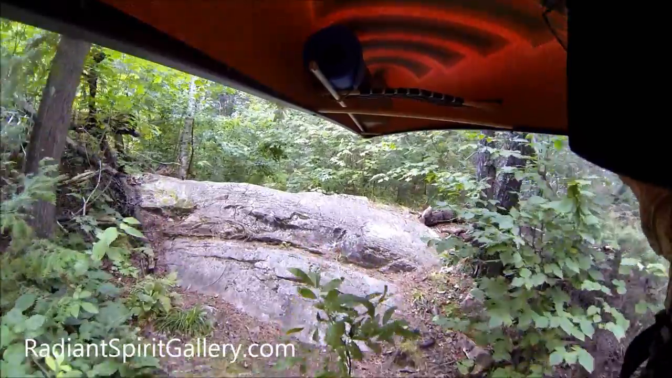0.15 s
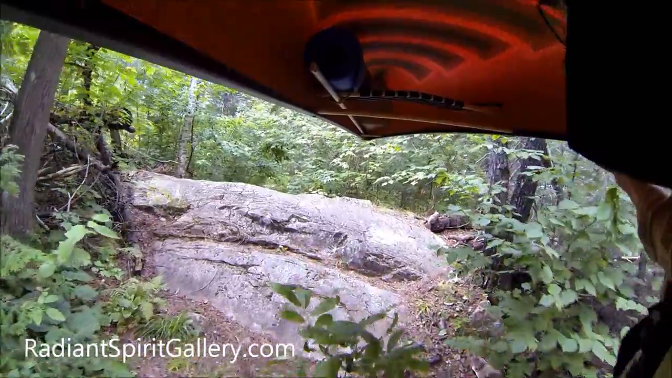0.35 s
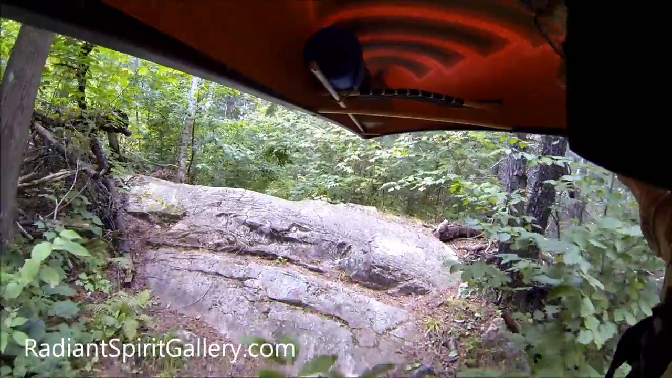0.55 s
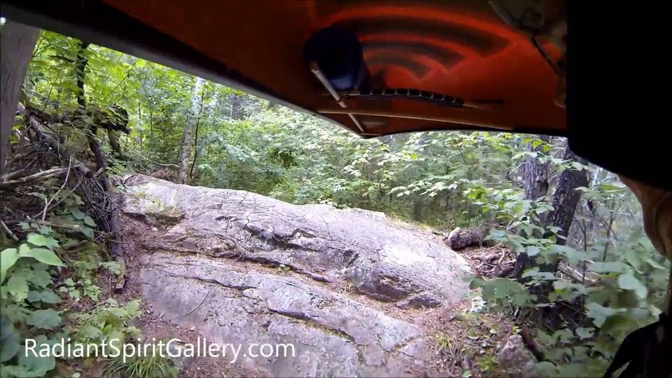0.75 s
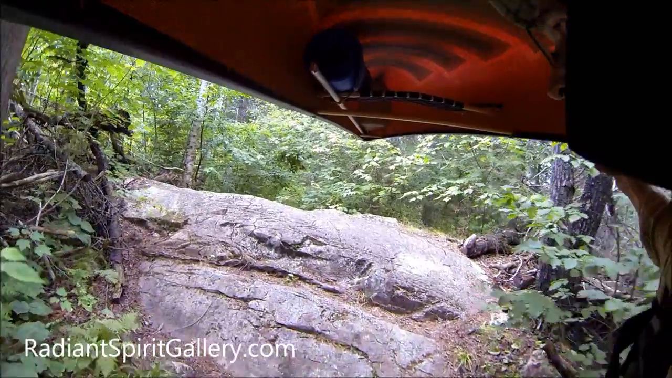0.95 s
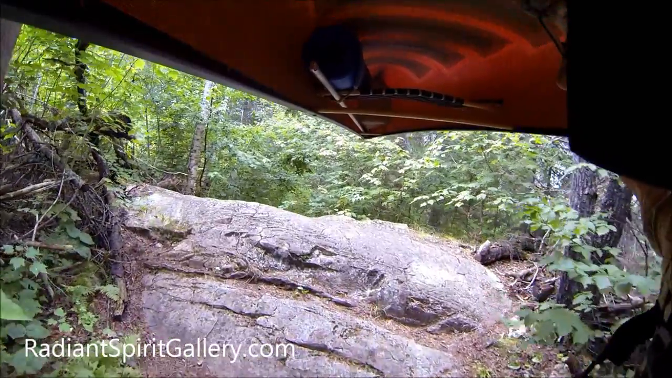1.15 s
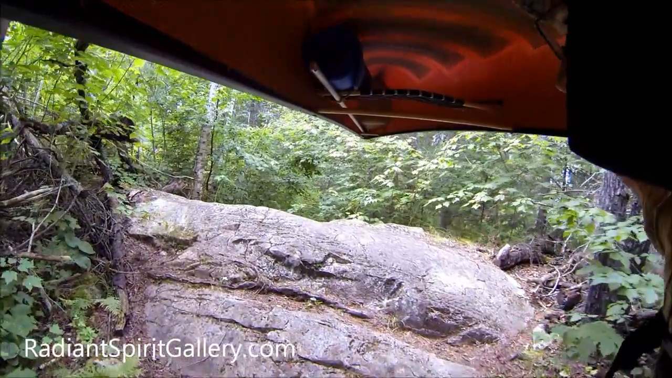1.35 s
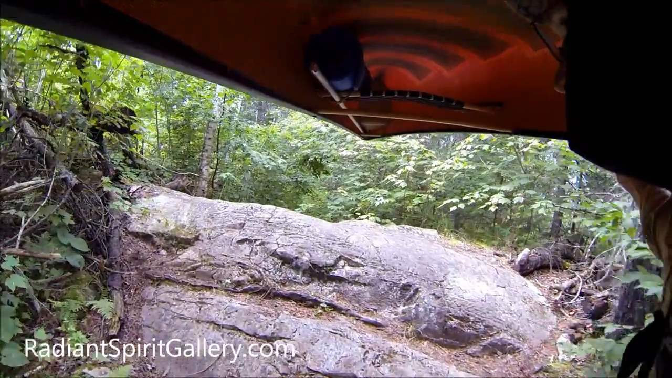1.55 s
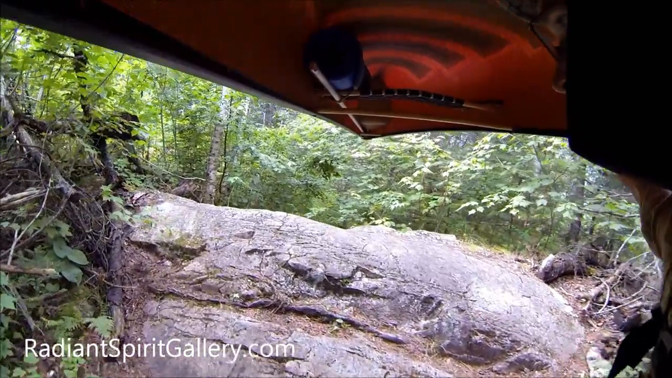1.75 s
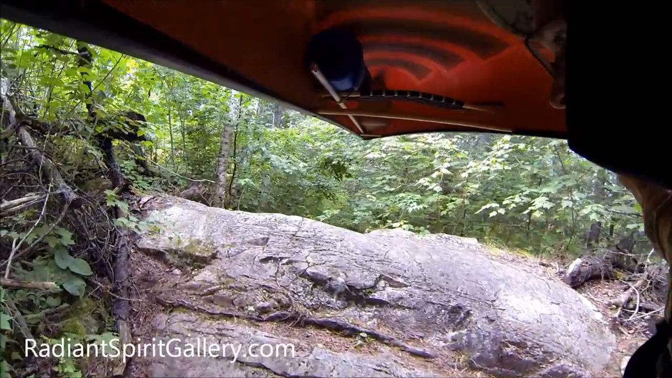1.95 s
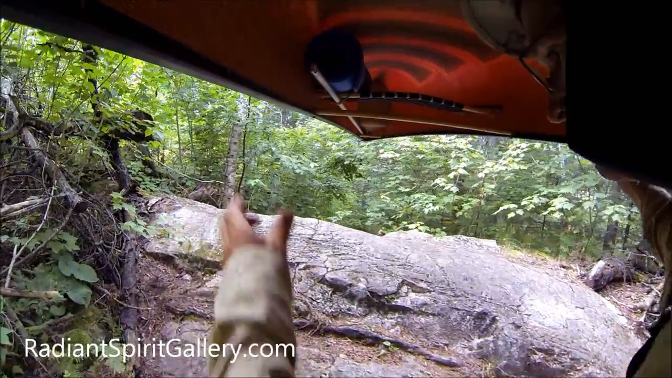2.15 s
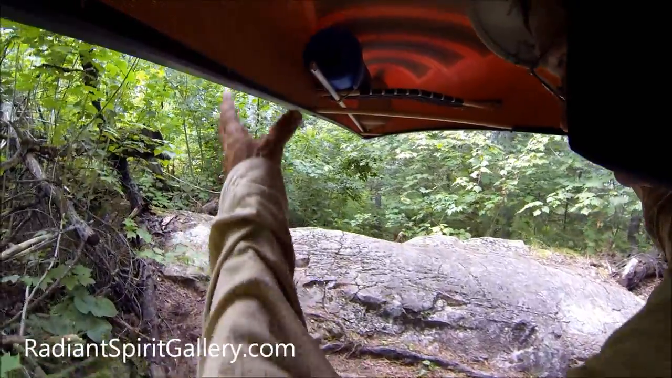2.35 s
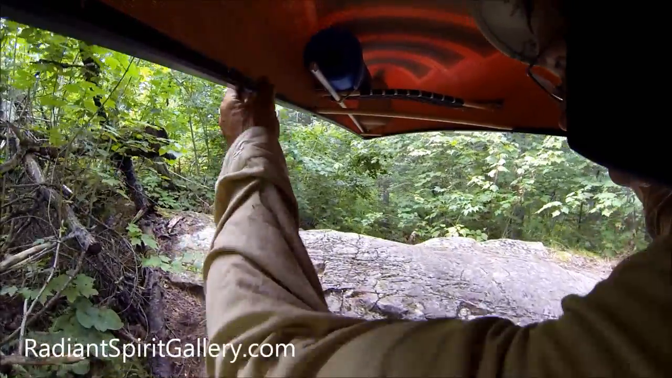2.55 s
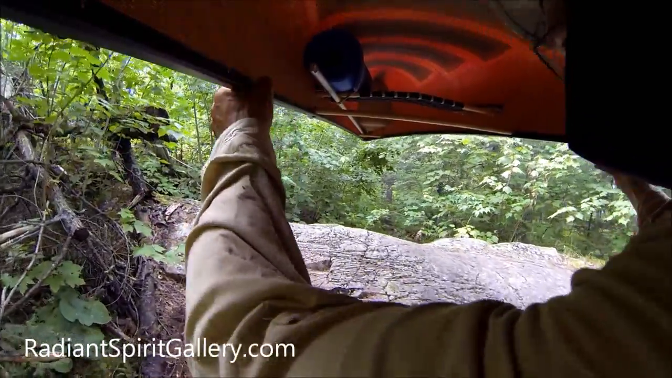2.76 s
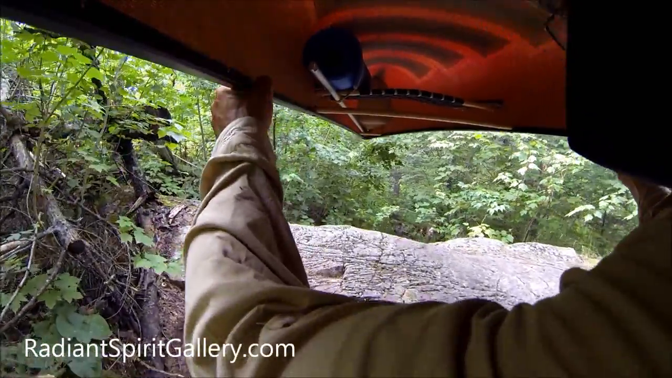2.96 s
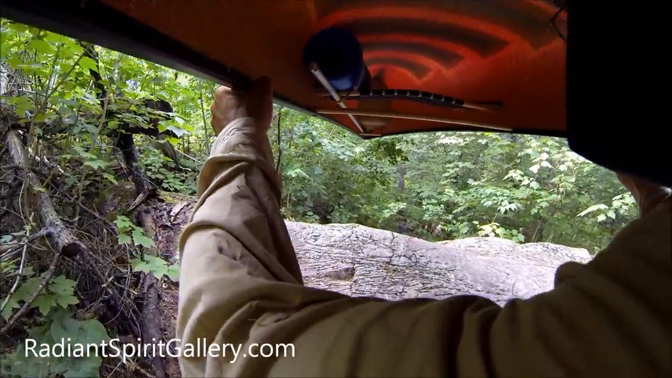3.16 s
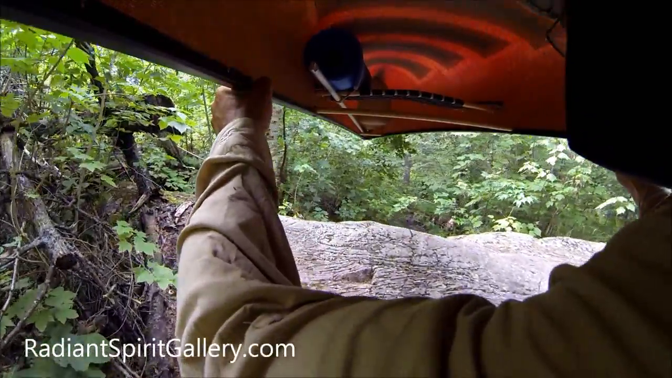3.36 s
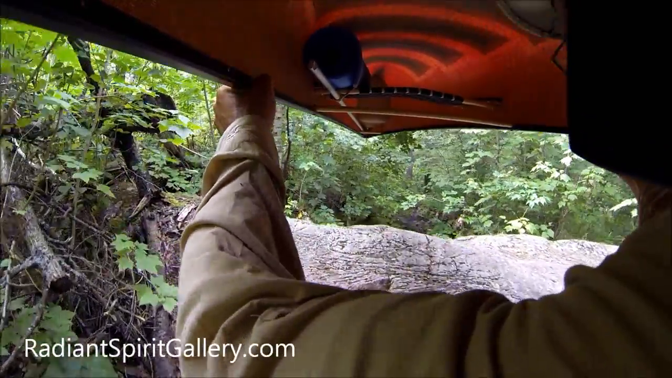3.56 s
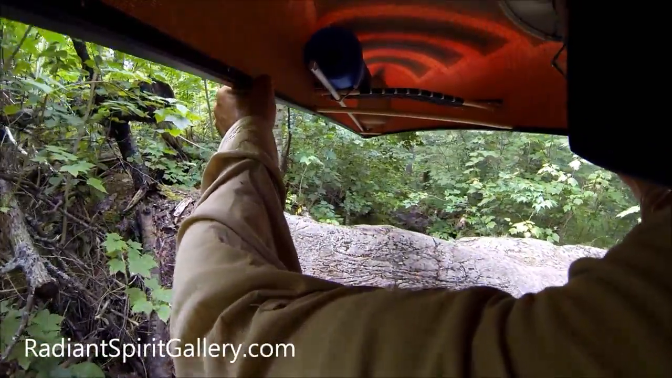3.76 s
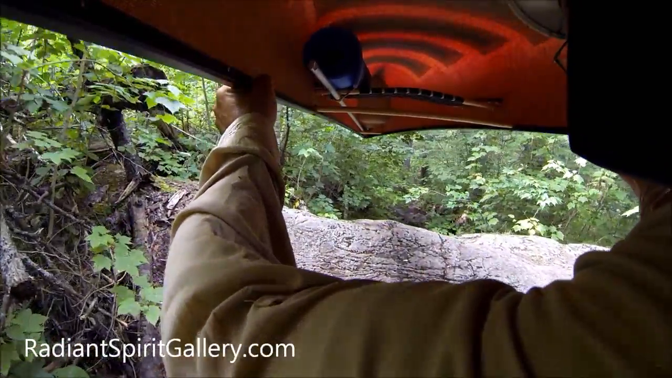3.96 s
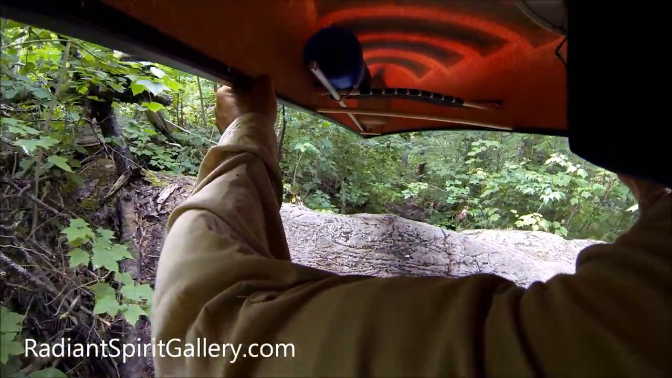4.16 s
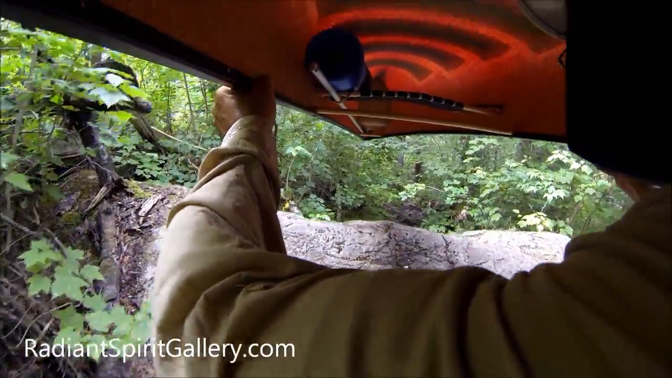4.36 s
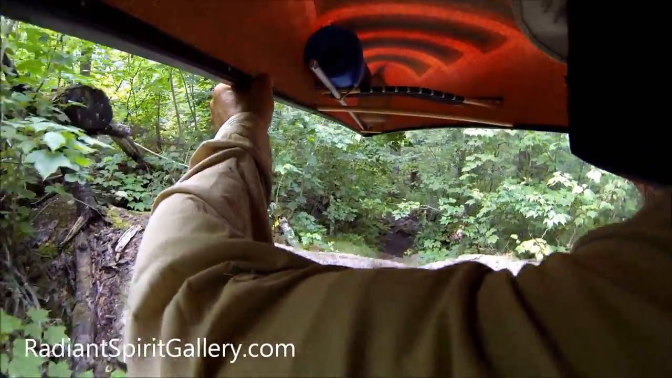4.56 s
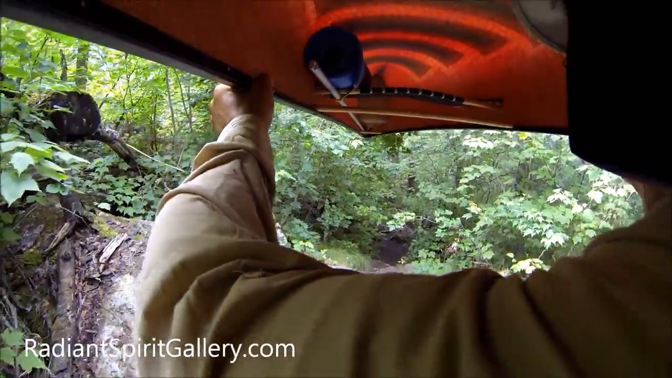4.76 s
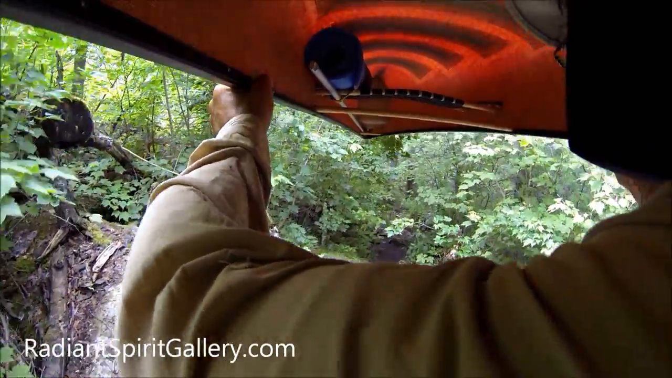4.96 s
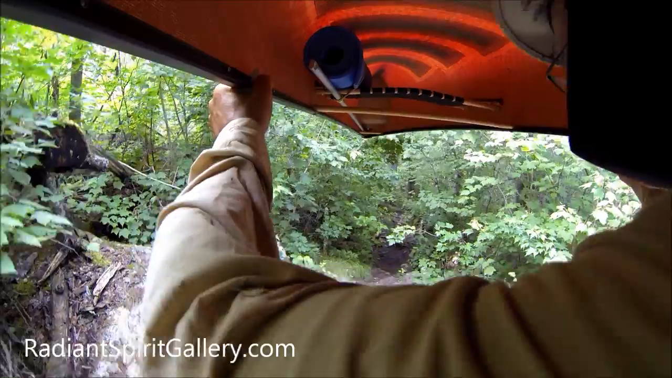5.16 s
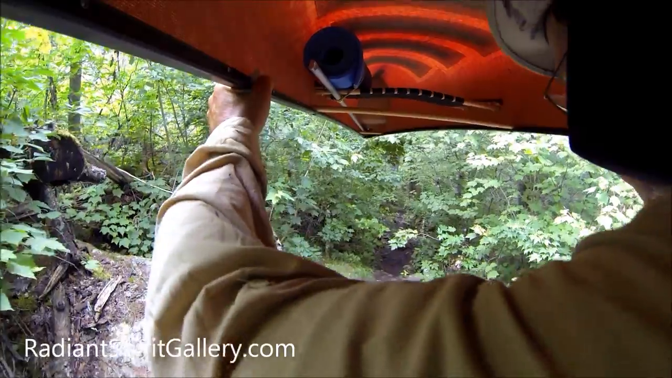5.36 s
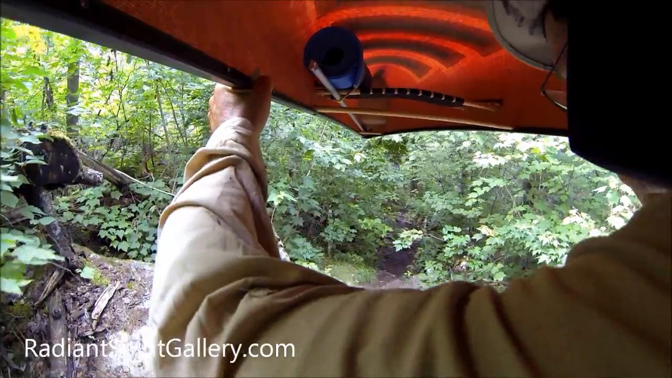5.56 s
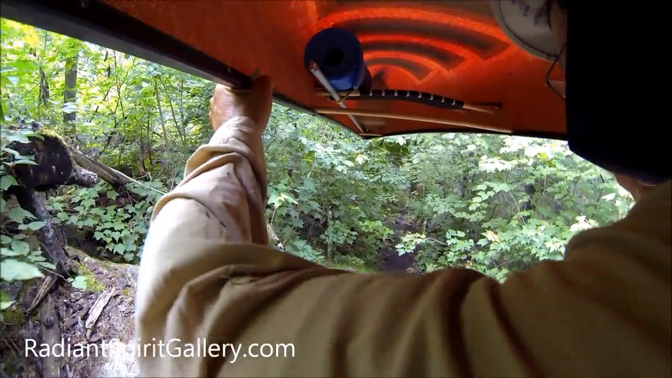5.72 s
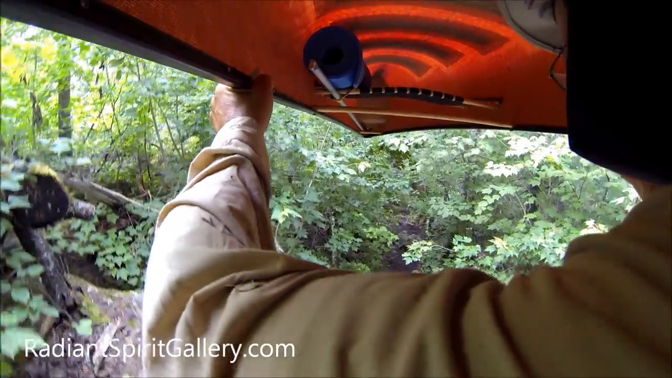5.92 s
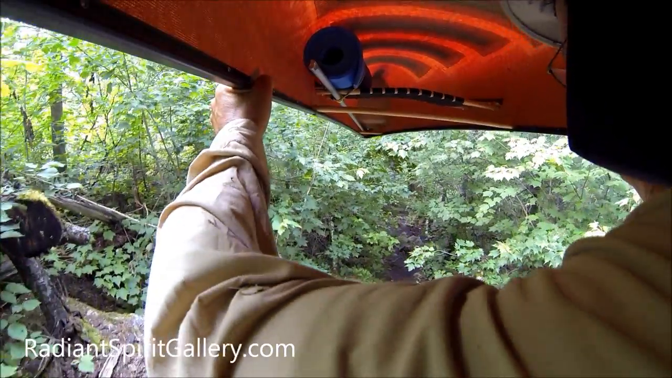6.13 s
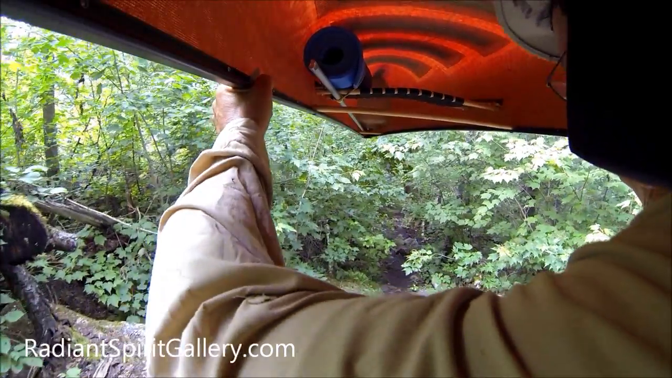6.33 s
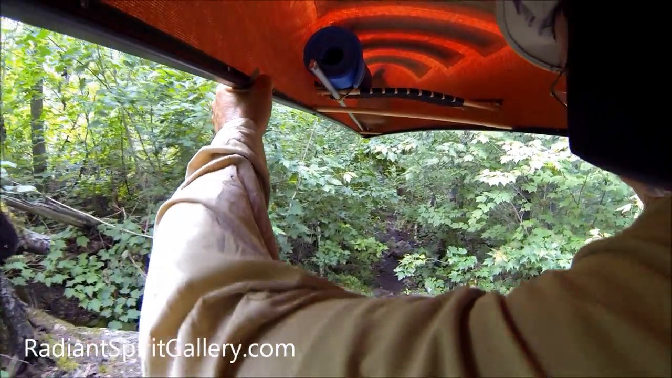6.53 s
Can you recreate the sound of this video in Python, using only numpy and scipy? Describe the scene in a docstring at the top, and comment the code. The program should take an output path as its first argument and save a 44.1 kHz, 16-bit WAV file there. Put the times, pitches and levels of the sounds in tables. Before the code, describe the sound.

Deep hull thuds and rumbling, soft leaf and cloth rubbing, scattered dry knocks, and a faint steady electronic hiss and whine behind.

```python
"""A low boom swells and dies under leafy rustling and sharp ticks, with a faint hiss and whine behind them.
A canoe is carried upside down along a forest trail, a small camera in a sealed case clamped inside the hull.
Steps and grips excite the hull's modes; leaves and cloth rub as dense random contacts; gear and twigs tick.
Rub and ticks are filtered by the resonant case; the camera's electronics whine at the frame rate."""
import sys
import numpy as np
from scipy import signal
from scipy.fft import rfft, irfft
from scipy.io import wavfile
from scipy.ndimage import uniform_filter1d, map_coordinates

SR = 44100
rng = np.random.default_rng(int(sys.argv[2]) if len(sys.argv) > 2 else 0)


def master_out(mix):
    """Clip the mix to full scale and print it as 16-bit PCM to the path in sys.argv[1]."""
    frames = np.transpose(np.atleast_2d(mix))
    ceiling = np.clip(frames, -1, 1)
    pcm = np.round(ceiling * 32767).astype(np.int16)
    wavfile.write(sys.argv[1], SR, pcm)


N = 290619
T = np.arange(N) / SR  # time in seconds


def amp(db):
    """Logarithmic level: the amplitude factor of a level in dB."""
    return 10 ** (np.asarray(db) / 20)


def unit(x):
    """Normalisation: the signal scaled to rms 1."""
    return x / np.sqrt(np.mean(x ** 2) + 1e-20)


def curves(rows):
    """Linear interpolation: the columns of a table, read against its first one, as signals."""
    s, *columns = np.transpose(rows)
    return [np.interp(T, s, column) for column in columns]


def band(x, low_hz, high_hz, order=2):
    """Band-pass filtering with a maximally flat (Butterworth) response."""
    sos = signal.butter(order, [low_hz, min(high_hz, .45 * SR)], "band", fs=SR, output="sos")
    return signal.sosfilt(sos, x)


def drift(rate):
    """Slow random fluctuation: a smooth curve through random points of spread 1, `rate` of them per second."""
    points = rng.standard_normal(int(N / SR * rate) + 4)
    return map_coordinates(points, [T * rate], order=3)


def ring(force, hz, t60):
    """Modal vibration: a damped resonator that answers a unit click with a ringing of initial height 1."""
    r = amp(-60 / (t60 * SR))  # decay per sample
    w = 2 * np.pi * hz / SR
    return signal.lfilter([0, np.sin(w)], [1, -2 * r * np.cos(w), r * r], force + 1e-18)


def colour(x, spectrum, peaks=()):
    """Minimum-phase filtering: a spectrum with resonances becomes a causal response of unit energy."""
    size = 8192
    hz = np.maximum(np.arange(size // 2 + 1) * SR / size, 1)
    corner_hz, corner_db = np.array(spectrum).T
    db = np.interp(np.log(hz), np.log(corner_hz), corner_db)
    for peak_hz, width_hz, peak_db in peaks:
        db = db + peak_db / (1 + (2 * (hz - peak_hz) / width_hz) ** 2)
    # folding the cepstrum onto positive times gives minimum phase
    cepstrum = irfft(np.log(amp(db)))
    cepstrum[1:size // 2] *= 2
    cepstrum[size // 2 + 1:] = 0
    response = irfft(np.exp(rfft(cepstrum)))
    return signal.fftconvolve(x, response / np.sqrt(np.sum(response ** 2)))[:len(x)]


def grains(per_s, spread_db):
    """Stochastic contact: sparse random impulses of uneven size, scaled to rms 1."""
    sizes = amp(spread_db * np.minimum(rng.exponential(1, N), 4.2)) * rng.standard_normal(N)
    return unit(sizes * (rng.random(N) < per_s / SR))


def evened(x, window_s, share):
    """Level smoothing: the random swells of a noise-driven ring are partly flattened."""
    power = uniform_filter1d(unit(x) ** 2, int(window_s * SR)) + 0.017
    return unit(x / power ** (np.clip(share, 0, 1) / 2))


def swells(s, db, rise_s, dies_db_per_s, rest_db):
    """Exponential decay: each swell rises, then falls in a straight line of dB; powers add to a resting level."""
    power = np.full(N, amp(rest_db) ** 2)
    for start, top_db, dies in np.broadcast(s, db, dies_db_per_s):
        i = int(start * SR)
        since = T[i:] - start
        rise = np.clip(since / rise_s, 0, 1)
        power[i:] += (rise * amp(top_db - dies * np.maximum(since - rise_s, 0))) ** 2
    return np.sqrt(power)


def patchy(x, edges_hz, patchy_db):
    """Independent modulation: neighbouring ranges swell and sink each on their own; rms 1."""
    ranges = zip(edges_hz, edges_hz[1:])
    return unit(sum(amp(patchy_db * drift(9)) * band(x, low, high, order=3) for low, high in ranges))


# Spectrum of the amplifier hiss. Each row: frequency in Hz, relative level in dB per Hz.
HISS_SPECTRUM = [(4000, 3.5), (5500, -5.5), (7500, -5.5), (9200, -10), (12000, -14.5), (14200, -12.5),
                 (15200, -35)]
# Whine in bursts. The row: centre in Hz, width in Hz, level in dB, share of each frame that it fills.
FRAME_WHINE = (10260, 620, -77.5, 0.33)
# Fainter, higher hiss between the bursts. The row: centre in Hz, width in Hz, level in dB.
BETWEEN_BURSTS = (10900, 1700, -83)
HISS_DB = -71
FRAME_HZ, FRAME_START_S = 23.976, .0235
LINE_HZ, LINE_DB, LINE_DEPTH = 13642, -84.5, .85  # a thin tone that sinks by this share during the bursts


def electronics():
    """Amplifier noise and periodic gating: hiss, and a whine that follows the sensor readout frame by frame."""
    buzz_hz, buzz_width_hz, buzz_db, share = FRAME_WHINE
    between_hz, between_width_hz, between_db = BETWEEN_BURSTS
    frame_phase = ((T - FRAME_START_S) * FRAME_HZ) % 1
    gate = uniform_filter1d(1. * (frame_phase < share), SR // 400)
    buzz = unit(band(rng.standard_normal(N), buzz_hz - buzz_width_hz / 2, buzz_hz + buzz_width_hz / 2))
    between = unit(band(rng.standard_normal(N), between_hz - between_width_hz / 2,
                        between_hz + between_width_hz / 2))
    line = np.sin(2 * np.pi * LINE_HZ * T) * (1 - LINE_DEPTH * gate)
    hiss = unit(band(colour(rng.standard_normal(N), HISS_SPECTRUM), 4000, 16000))
    out = amp(HISS_DB) * hiss
    out += amp(buzz_db + 1.6 * drift(16.0)) * buzz * gate
    out += amp(between_db) * between * (1 - gate)
    out += amp(LINE_DB + 1.4 * drift(6.2)) * line
    return out


# Brief swishes, scuffs and squeaks, as of dry leaves and a hand on the hull, and perhaps a bird's chirp near 5.2 s.
# Each row: start in seconds, length in seconds (cut at 0.2), centre in Hz, width in Hz, crest level in dB.
SWISH_EVENTS = [(.25, .06, 7400, 120, -77), (.37, .09, 6200, 120, -76), (.59, .04, 7300, 200, -76),
                (0.2, 0.082, 3200, 150, -55), (0.333, 0.036, 2300, 120, -54), (0.49, .035, 3100, 150, -51),
                (0.72, 0.055, 3200, 150, -56), (0.26, 0.028, 760, 98, -49), (0.66, 0.085, 1270, 220, -44),
                (0.854, .05, 2150, 190, -48), (1.192, 0.096, 1470, 310, -42), (2.49, 0.079, 530, 460, -39),
                (6.075, 0.1, 590, 450, -39), (2.562, 0.21, 1500, 444, -34), (1.515, 0.037, 7000, 5000, -67),
                (3.302, 0.098, 7400, 900, -65.5), (3.346, 0.039, 5230, 500, -63),
                (5.163, 0.088, 4600, 140, -65.5), (5.188, 0.025, 5000, 200, -65),
                (5.23, 0.032, 4800, 330, -61)]


def swishes():
    """Amplitude modulation: short half-sine swells of band-limited noise."""
    out = np.zeros(N)
    noises = rng.standard_normal((len(SWISH_EVENTS), SR // 5))
    for (s, length, hz, width_hz, db), noise in zip(SWISH_EVENTS, noises):
        swell = np.sin(np.pi * np.clip(T[:len(noise)] / length, 0, 1))
        i = int(s * SR)
        out[i:i + len(noise)] += amp(db) * swell * unit(band(noise, hz - width_hz / 2, hz + width_hz / 2))
    return out


# Path through the sealed case. Each row: frequency in Hz, relative level in dB.
CASE_PATH = [(100, -2), (162, -28.5), (273, -21), (353, -25.5), (476, -21.5), (672, -26.5), (978, -30),
             (1320, -23), (1780, -28.5), (2370, -23.5), (2970, -35.5), (3610, -38.5), (4690, -54.5),
             (10000, -78.5)]
# Resonances and notches of the case. Each row: centre in Hz, width in Hz, height in dB.
CASE_RESONANCES = [(283.4, 16, 5), (483.4, 19.6, 7), (534, 61, 3.5), (804, 126, 10), (922, 40, -0.5),
                   (1284.6, 86, 10), (1543, 143, 9.5), (2340, 580, 0.5), (2593, 294, -10.5),
                   (2992, 255, 8.5), (4290, 38, 7), (5100, 210, 10.5)]


def through_case(x):
    """Transmission through a resonant enclosure: the case favours its own resonances and dulls the top."""
    return colour(x, CASE_PATH, CASE_RESONANCES)


# Brushing of leaves and cloth. Each row: time in seconds, bright rustle in dB, dull rub in dB.
BRUSH_LEVELS = [(0.0, -44.5, -46), (0.29, -47, -49.5), (0.73, -46.5, -47), (1.12, -46.5, -42),
                (1.63, -43, -45.5), (1.83, -40, -47), (2.24, -37, -41), (2.51, -35, -42),
                (2.83, -39.5, -47.5), (3.12, -41, -49.5), (3.36, -40, -48.5), (3.65, -46.5, -50),
                (3.85, -39.5, -45.5), (4.24, -46.5, -51), (4.53, -46, -41), (4.88, -48.5, -44.5),
                (5.2, -40.5, -41), (5.35, -47, -46.5), (5.53, -46, -45.5), (5.8, -44, -46.5),
                (6.0, -42.5, -39.5), (6.17, -52, -50), (6.59, -51, -54)]
CRISP_DB, CRISP_FOLLOWS = -30, 0.68  # the thin top: below the mean bright level, share of its swing in dB


def brushing():
    """Granular friction: dense contacts over a bed of noise, through the case, swelling in three ranges."""
    bright_db, dull_db = curves(BRUSH_LEVELS)
    mean_db = bright_db.mean()
    crisp_db = mean_db + CRISP_DB + CRISP_FOLLOWS * (bright_db - mean_db)
    flutter = drift(18)  # shared by the contact rate and all three levels
    rub = 0.66 * grains(2500 * amp(2.8 * flutter), spread_db=6.0) + rng.standard_normal(N)
    heard = through_case(rub)
    bright = patchy(heard, [1149, 1409, 1800, 2490, 3630, 5540], patchy_db=1.5)
    dull = patchy(heard, [120, 350, 650, 1100], patchy_db=1.5)
    crisp = unit(band(heard, 5420, 8100, order=3))
    out = amp(bright_db + 1.18 * flutter + 1.15 * drift(9)) * bright
    out += amp(dull_db + 2.7 * flutter + 1.4 * drift(6.8)) * dull
    out += amp(crisp_db + 0.5 * flutter) * crisp
    return out


# Ticks of gear, twigs and a slipping strap.
# Each row: start in seconds, peak in dB, centre in Hz, t60 in seconds (the decay itself is held to 0.005-0.2).
TICK_EVENTS = [(0.095, -22, 1330, 0.043), (0.182, -30, 2080, 0.06), (0.2, -30, 743, 0.044),
               (0.468, -28.5, 615, 0.041), (.828, -34, 1480, 0.035), (.94, -30, 750, 0.11),
               (.988, -29, 1360, 0.06), (1.051, -27.5, 1396, 0.13), (1.084, -28, 1340, 0.06),
               (1.292, -27, 573, 0.045), (1.322, -37, 1540, 0.059), (1.345, -30, 1680, 0.13),
               (1.359, -19, 767, 0.084), (1.365, -23.5, 1600, 0.075), (1.407, -29.5, 1310, 0.1),
               (2.007, -19, 1630, 0.093), (2.098, -22, 1460, 0.034), (2.135, -22.5, 1390, 0.045),
               (2.209, -21.5, 1350, 0.052), (2.247, -24.5, 1380, 0.057), (2.318, -25, 1538, 0.037),
               (2.355, -26.5, 1280, 0.066), (2.488, -25.5, 1510, 0.042), (2.539, -23.5, 1440, 0.11),
               (2.596, -23, 1435, .08), (2.663, -25.5, 1480, 0.26), (2.771, -30, 1263, 0.032),
               (3.074, -30.5, 1560, 0.099), (3.327, -29, 1430, 0.047), (3.559, -27, 1290, 0.038),
               (3.583, -22, 1510, 0.011), (3.704, -29.5, 740, 0.039), (4.179, -29.5, 770, 0.043),
               (4.347, -30, 790, 0.012), (4.356, -21.5, 2100, 0.019), (4.397, -31, 1290, 0.0087),
               (4.45, -16, 1210, 0.031), (4.456, -9.5, 1310, 0.0076), (4.461, -21, 845, 0.013),
               (4.497, -27.5, 1380, 0.24), (4.558, -23, 1350, 0.041), (4.699, -26.5, 477, 0.035),
               (4.732, -30, 1270, 0.035), (5.047, -20.5, 1270, 0.11), (5.084, -26, 1310, 0.14),
               (5.115, -16, 1500, 0.019), (5.285, -20, 1490, 0.01), (5.322, -31, 1300, 0.016),
               (5.376, -32.5, 720, 0.019), (5.555, -28, 1360, 0.029), (5.756, -32.5, 1240, 0.026),
               (5.814, -24, 1280, 0.1), (5.92, -22.5, 2390, 0.047), (5.952, -19.5, 1210, 0.04),
               (6.077, -24, 794, 0.071), (6.092, -23, 800, 0.082), (6.099, -24.5, 482, 0.17),
               (6.114, -26, 800, 0.11), (6.128, -25, 497, 0.16), (6.169, -32.5, 510, .03)]
TICK_RISE_SHARE = .035  # rise time as a share of t60
TICK_CRACK_S = 0.043  # over t60: height of the first touch against the scratch noise
TICK_OWN_DB, LONGER_RINGS_DB = 3.5, 3  # own pitch against the case at t60 0.18 s; dB more per doubling of t60
TICK_DULL_HZ = 3100  # the contact is blunt above


def ticks():
    """Impact excitation: each contact is a dying burst that rings at its own pitch and through the case."""
    length = int(.15 * SR)
    out, since = np.zeros(N), T[:length]
    noises = rng.standard_normal((len(TICK_EVENTS), length))
    for (s, peak_db, hz, t60), noise in zip(TICK_EVENTS, noises):
        rise_s = TICK_RISE_SHARE * t60
        burst = noise * amp(-60 * since / np.clip(t60, .005, .2)) * np.minimum(since / rise_s, 1)
        burst[int(rise_s * SR)] += TICK_CRACK_S / t60
        through = through_case(burst)
        case = band(through, 140, TICK_DULL_HZ, order=1) + 0.28 * band(through, TICK_DULL_HZ, 9000)
        # short ticks are broad cracks, so only long ones show much pitch
        own_db = TICK_OWN_DB + LONGER_RINGS_DB * np.log2(t60 / 0.18)
        tick = amp(own_db) * unit(band(burst, hz / 1.128, hz * 1.084)) + unit(case)
        i = int(s * SR)
        out[i:i + length] += (amp(peak_db) * tick / np.abs(tick).max())[:N - i]
    return out


# Jolts from steps and grips. Each row: start in seconds, push in dB, lean of the modes in dB per octave,
# knock in dB, shudder in dB, sway in dB, decay of the shudder in dB per second.
JOLT_EVENTS = [(0.0, -32, 5, -36, -26.5, -49, 39), (0.346, -30.5, -9, -47, -32, -31, 52),
               (0.937, -29, -21, -48, -23.5, -27, 128), (1.14, -53, -2, -40, -31.5, -38, 125),
               (1.443, -31, 0, -36, -34, -26, 122), (1.56, -30, -12, -33.5, -49, -27.5, 94),
               (1.82, -36, -2, -55, -42, -55, 42), (2.107, -35, 1, -38, -29, -21.5, 48),
               (2.243, -26.5, 1, -35, -20, -42.5, 97), (2.424, -16.5, -19, -38, -26, -19.5, 54.5),
               (2.485, -30.5, 4.5, -26.5, -15, -22, 125), (2.515, -21, 0.5, -30, -20.5, -33, 200.5),
               (2.551, -2, -10.5, -25.5, -19.5, -12, 65), (2.594, -19, -14, -48, -14.5, -31.5, 59.5),
               (2.699, -22.5, -11, -42, -26, -32, 96), (3.347, -34, 2, -54, -28, -33, 45),
               (3.536, -24, -15, -32, -33, -26, 90), (3.781, -23.5, -28, -41, -20.5, -45, 254),
               (4.203, -44, -1.5, -36, -31, -42, 12), (4.371, -38, 14, -46, -25.5, -42, 161),
               (4.466, -19.5, 2, -29.5, -25.5, -38, 197), (4.612, -36, -8, -39, -20.5, -36.5, 27.5),
               (4.702, -11.5, 2.5, -21.5, -25, -37, 76), (4.765, -26, -4, -41, -28, -31, 157),
               (4.809, -24, -6, -46, -36, -25.5, 58), (5.28, -32, 3, -42, -42, -27.5, 76),
               (5.719, -38, 3, -51, -31, -37, 53), (5.818, -22.5, 30, -52, -23, -48, 55),
               (6.085, -29, -1, -35, -31, -45, 49), (6.316, -25, 12, -37.5, -19.5, -48, 252)]
# Modes of the hull, the sway of the whole boat first.
# Each row: frequency in Hz, relative level in dB, t60 in seconds.
HULL_MODES = [(44.5, -12, 0.12), (71.75, -1, 0.35), (82.7, 1.5, 0.58), (91, -18.5, 0.45), (127, -32.5, 0.1)]
KNOCK_T60_S, KNOCK_LOW_HZ, KNOCK_HIGH_HZ = 0.11, 105, 241


def jolts():
    """Impulsive modal excitation: a soft push sets every hull mode ringing, with a short dull knock."""
    s, push_db, lean, knock_db = np.transpose(JOLT_EVENTS)[:4]
    at, out = (s * SR).astype(int), np.zeros(N)
    push = np.hanning(int(0.0063 * SR))
    for hz, db, t60 in HULL_MODES:
        force = np.zeros(N)
        force[at] = amp(push_db + db + lean * np.log2(hz / 72))
        out += ring(signal.fftconvolve(force, push / push.sum())[:N], hz, t60)
    knocks = np.zeros(N)
    knocks[at] = amp(knock_db)
    dying = signal.lfilter([1], [1, -amp(-60 / (KNOCK_T60_S * SR))], knocks)
    white = rng.standard_normal(N)
    steady_level = np.std(band(white, KNOCK_LOW_HZ, KNOCK_HIGH_HZ))
    return out + band(dying * white, KNOCK_LOW_HZ, KNOCK_HIGH_HZ) / steady_level


SHUDDER_RISE_S, SWAY_RISE_S, SWAY_DIES_DB_PER_S = 0.016, 0.023, 142
JOSTLE_DB, REST_SWAY_DB = -41.5, -42  # resting levels of shudder and sway between the jolts


def boom():
    """Random modal excitation: jostling drives the hull, which shudders up after jolts; the whole boat sways."""
    s, _, _, _, shudder_db, sway_db, dies = np.transpose(JOLT_EVENTS)
    modes = sum(amp(db) * unit(ring(rng.standard_normal(N), hz, t60)) for hz, db, t60 in HULL_MODES[1:])
    sway_hz, _, sway_t60 = HULL_MODES[0]
    sway = unit(ring(rng.standard_normal(N), sway_hz, sway_t60))
    sway = sway + 0.54 * unit(band(rng.standard_normal(N), 42, 59.7))
    shudder_level = swells(s, shudder_db, SHUDDER_RISE_S, dies, JOSTLE_DB)
    sway_level = swells(s, sway_db, SWAY_RISE_S, SWAY_DIES_DB_PER_S, REST_SWAY_DB)
    return shudder_level * evened(modes, 0.032, share=.5) + sway_level * evened(sway, 0.14, share=0.45)


def scene():
    """Superposition: the pressures of all sources add at the one microphone."""
    return (electronics() + swishes() + brushing() + ticks() + jolts() + boom())[None, :]


MIC_LOW_HZ, CUTOFF_HZ = 36.4, 15100  # the microphone fades below; the top is cut above
LIMIT_DB, LIMIT_SHARE = -10, .5  # gain control: threshold, share of the excess taken off
LIMIT_ATTACK_S, LIMIT_RECOVERS_DB_PER_S = .03, 25


def record(dry):
    """Dynamic compression: the lowest bass fades, gain ducks too late for the hardest jolts, the top is cut."""
    heard = signal.sosfilt(signal.butter(3, MIC_LOW_HZ, "high", fs=SR, output="sos"), dry)
    level_db = 20 * np.log10(np.abs(heard) + 1e-9)
    over_db = LIMIT_SHARE * np.maximum(level_db - LIMIT_DB, 0)
    # the reduction holds its peaks and recovers in a straight line of dB
    recovery_db = LIMIT_RECOVERS_DB_PER_S * T
    held_db = np.maximum.accumulate(over_db + recovery_db, axis=1) - recovery_db
    r = np.exp(-1 / (LIMIT_ATTACK_S * SR))
    heard = heard * amp(-signal.lfilter([1 - r], [1, -r], held_db))
    top_cut = signal.cheby2(12, 40, CUTOFF_HZ, fs=SR, output="sos")
    return signal.sosfilt(top_cut, np.clip(heard, -1, 1))


dry = scene()
out = record(dry)
master_out(out)
```